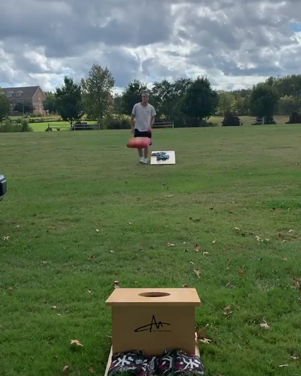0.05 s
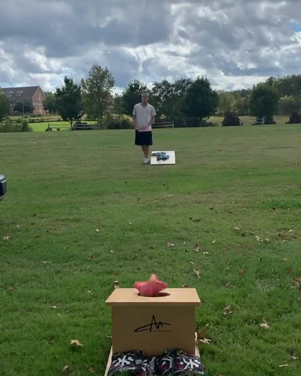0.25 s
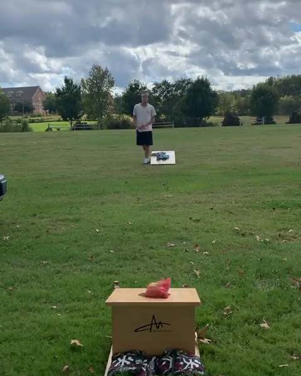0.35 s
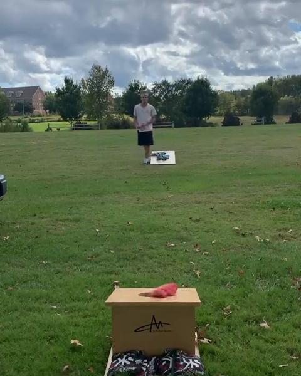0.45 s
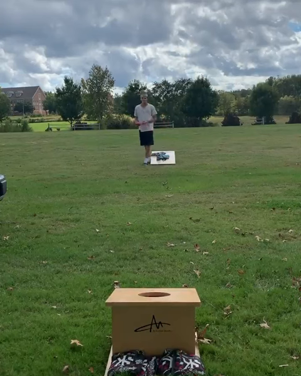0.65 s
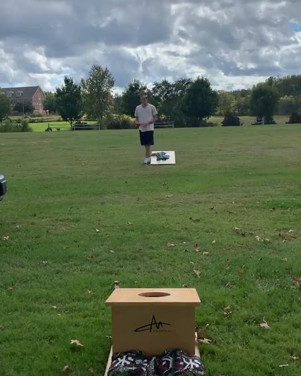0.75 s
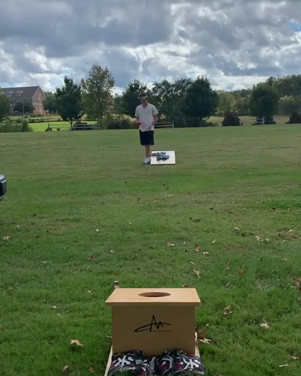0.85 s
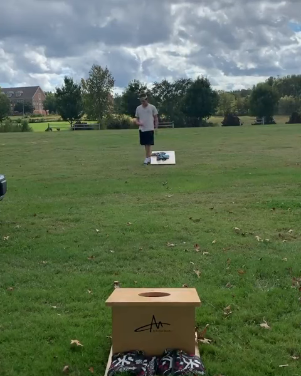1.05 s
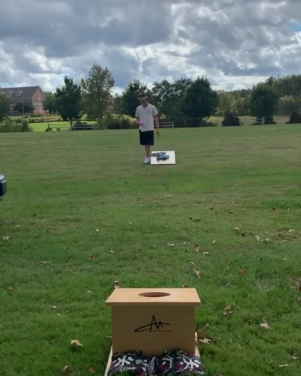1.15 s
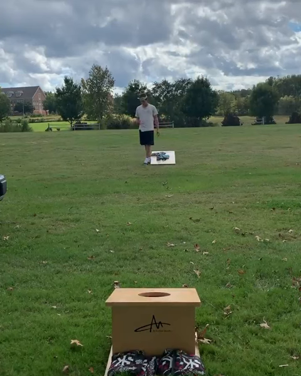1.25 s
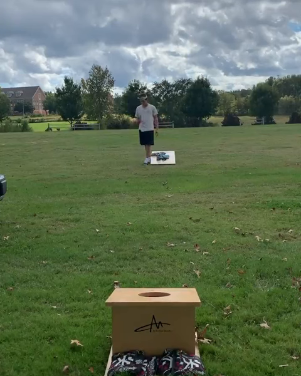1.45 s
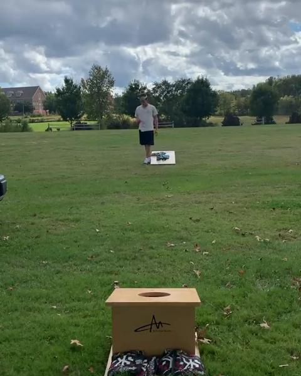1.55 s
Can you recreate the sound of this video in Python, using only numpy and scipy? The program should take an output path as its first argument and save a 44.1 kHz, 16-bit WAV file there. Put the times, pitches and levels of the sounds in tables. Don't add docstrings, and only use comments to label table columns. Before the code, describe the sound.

One sharp, dry wooden thud close to a phone microphone, followed by a quick granular settling and faint cloth rustle, then only steady distant engine hum and wind in trees across an open grassy field.

```python
import sys
import numpy as np
from scipy import signal
from scipy.fft import rfft, irfft
from scipy.io import wavfile
from scipy.ndimage import uniform_filter1d

SR = 44100
rng = np.random.default_rng(int(sys.argv[2]) if len(sys.argv) > 2 else 0)


def magnitude_from_level(level_db):
    exponent = np.asarray(level_db, float) / 20
    return 10 ** exponent


def transcribe(signal):
    frames = np.atleast_2d(signal).T
    limited = np.clip(frames, -1, 1)
    pcm = np.round(limited * 32767).astype(np.int16)
    wavfile.write(sys.argv[1], SR, pcm)


N = 70560

# [f/Hz, level/dB per Hz]
FIELD_SPECTRUM = [(25, -39), (60, -5.5), (130, -11.5), (400, -21.5), (850, -19), (1900, -28), (2450, -40.5),
                  (4000, -39.5), (16000, -67.5)]
# [f/Hz, width/Hz, level/dB]
ENGINE_HUM = [(52, 7.5, -49.5), (72.9, 1.9, -46), (89.2, 15, -51), (102.2, 4, -43.5), (123.4, 10, -49),
              (189.8, 17, -64), (305.5, 9.1, -52)]
# [f/Hz, width/Hz, level/dB]
TREBLE_GAPS = [(4684, 208, -25), (9110, 120, -31), (10200, 350, -8.5), (12500, 270, -12), (13100, 300, -24),
               (14800, 1400, -3)]
# [t/s, half length/s, level/dB]
CLOTH_SLIDES = [
    (.28, .04, -64),
    (.375, .05, -69),
    (.62, .04, -83),
    (.71, .03, -80),
    (1.6, .012, -62),
]
# [f/Hz, level/dB per Hz]
CLOTH_SPECTRUM = [(2000, -29), (6000, -6), (10000, -3), (16000, -15)]
# [f/Hz, level/dB per Hz]
SLAP_SPECTRUM = [(300, 12), (900, 6.5), (2000, 0.5), (3700, 0), (6000, -8), (8000, -20.5), (11500, -12),
                 (16000, -21)]
# [f/Hz, level/dB per Hz]
SETTLE_SPECTRUM = [(300, -5), (1000, 1), (2000, 2.5), (4000, 0.5), (6000, -7), (9000, -13.5),
                   (16000, -19.5)]
# [t/s, level/dB]
CLUMP_KNOCKS = [
    (0.2417, -24.5),
    (0.2424, -23),
    (0.2455, -16.5),
    (.2481, -25),
    (0.2511, -36),
    (0.2543, -35),
    (0.257, -24),
]
# [f/Hz, level/dB, t60/s]
BRIGHT_LID_MODES = [(5920, -1.5, .007), (8050, -8, 0.0079), (11060, -9.5, 0.0089), (3250, -4, 0.01)]
# [t/s, level/dB, contact time/ms]
BAG_PUSHES = [
    (.24109, -1, .4),
    (.24242, 3.5, 1.27),
    (.24649, 2.4, 1.5),
]
# [f/Hz, level/dB, t60/s, sign of the mode shape under the bag]
BOX_MODES = [(150.5, -17.6, .175, 1), (722, -32, .16, 1), (301, -24, .14, 1), (365, -18.5, .13, 1),
             (530, -14, .024, 1), (638, -9, .016, 1), (735, -9.3, .02, 1), (827, -9.6, .032, -1),
             (1006, -23.4, .052, -1), (1207, -16, .045, 1), (1420, -27, .06, -1), (1640, -18.5, .072, -1),
             (1800, -13.5, .035, 1), (2175, -27, .07, 1)]
# [f/Hz, side minus mid level/dB]
PORT_DIFFERENCE = [(60, -48), (130, -58), (350, -10.5), (800, -28), (1300, -26), (2400, -7), (4400, -13.5),
                   (15000, -1.5)]
# [f/Hz, width/Hz, level/dB]
CASE_RESONANCES = [(4694, 750, -7), (6430, 2580, 5.5)]


def curve(points):
    p = np.array(points, float)
    return np.interp(np.log(np.fft.rfftfreq(2 * N, 1 / SR) + 1), np.log(p[:, 0]), p[:, 1])


def bumps(table):
    f = np.fft.rfftfreq(2 * N, 1 / SR)
    return sum(db * np.exp(-((f - hz) / width) ** 2) for hz, width, db in table)


def colour(x, db):
    cepstrum = irfft(db * np.log(10) / 20)
    cepstrum[1:N] *= 2
    cepstrum[N + 1:] = 0
    response = np.exp(rfft(cepstrum))
    return irfft(rfft(x, 2 * N) * response)[..., :N]


def unit(x):
    return x / np.sqrt(np.mean(x ** 2))


def ring(x, hz, t60):
    pole = np.exp(2j * np.pi * hz / SR - np.log(1000) / (t60 * SR))
    return signal.lfilter([1], [1, -pole], x).imag


def walk(rate):
    k = int(SR / rate)
    held = np.repeat(rng.standard_normal(N // k + 1), k)
    smooth = uniform_filter1d(uniform_filter1d(held, k), k)
    return unit(smooth[:N])


def field(t):
    floor_db, gust_db, flicker_db = -40, 0.4, 0.7
    hum_steady, hum_loose = 0.81, 0.5
    octaves = np.log2(np.fft.rfftfreq(N, 1 / SR) + 1)
    gust = gust_db * walk(0.55)
    tone_db = curve(FIELD_SPECTRUM) + bumps(TREBLE_GAPS)
    noise = rfft(unit(colour(rng.standard_normal((2, N)), tone_db)))
    out = 0
    for octave in range(4, 15):
        window = np.cos(np.pi / 2 * np.clip(octaves - octave, -1, 1)) ** 2
        band = irfft(noise * window, N)
        out = out + band * magnitude_from_level(floor_db + gust + flicker_db * walk(9.13))
    for hz, width, db in ENGINE_HUM:
        cycles = hz * t + rng.random() + 0.029 * walk(3)
        steady = np.sin(2 * np.pi * cycles)
        loose = unit(ring(rng.standard_normal(2 * N), hz, 1.57 / width)[N:])
        hum = magnitude_from_level(db) * (hum_steady * steady + hum_loose * loose)
        out = out + hum * np.array([[1], [0]])
    return out


def cloth(t):
    env = sum(magnitude_from_level(db) * np.exp(-((t - s) / half) ** 2) for s, half, db in CLOTH_SLIDES)
    tone_db = curve(CLOTH_SPECTRUM) + bumps(TREBLE_GAPS) / 2
    rustle = unit(colour(rng.standard_normal((2, N)), tone_db))
    return rustle * env * magnitude_from_level(2 * walk(59))


def grains():
    per_s, spread_db = 9000, 3
    size_chance, sign_chance, hit_chance = rng.random((3, N))
    size = magnitude_from_level(-spread_db * np.log(1 - size_chance)) * np.sign(sign_chance - 0.5)
    return unit(size * (hit_chance < per_s / SR))


def filling_layer(since_hit, db, t60, spectrum):
    clicks = np.array([grains(), grains()])
    return unit(colour(clicks, curve(spectrum))) * magnitude_from_level(db - 60 * since_hit / t60)


def rattle(t):
    start_s, attack_s = 0.2408, 0.00085
    side_db, side_rise_s = 12.5, 0.059
    since_hit = np.maximum(t - start_s, 0)
    slap = filling_layer(since_hit, -15.5, 0.08, SLAP_SPECTRUM)
    settle = filling_layer(since_hit, -26, 0.17, SETTLE_SPECTRUM)
    mid, side = (1 - np.exp(-since_hit / attack_s)) * (slap + settle)
    side_growth = 1 - np.exp(-since_hit / side_rise_s)
    return np.array([mid, side * magnitude_from_level(side_db) * side_growth])


def clacks():
    ticks = np.zeros(N)
    for s, db in CLUMP_KNOCKS:
        ticks[int(s * SR)] = magnitude_from_level(db)
    knocks = sum(magnitude_from_level(db) * ring(ticks, hz, t60) for hz, db, t60 in BRIGHT_LID_MODES)
    return knocks * np.array([[1], [0]])


def box(t):
    lag_cycles = 0.625
    side_db, side_lag_s = -3.5, 0.012
    out = 0
    for hz, db, t60, sign in BOX_MODES:
        force = 0
        for s, push_db, ms in BAG_PUSHES:
            phase = np.clip((t - s - lag_cycles / hz) / (ms / 1000), 0, 1)
            force = force + magnitude_from_level(push_db) * np.sin(np.pi * phase) ** 2 / (ms / 2000)
        mode = ring(np.diff(force, prepend=0), hz, t60) / (2 * np.pi * hz)
        out = out + sign * magnitude_from_level(db) * mode
    low_cut = signal.butter(2, 85, "high", fs=SR, output="sos")
    out = signal.sosfilt(low_cut, out)
    side = magnitude_from_level(side_db) * np.interp(t - side_lag_s, t, out)
    return np.array([out, side])


def scene():
    t = np.arange(N) / SR
    mid, side = rattle(t) + cloth(t) + field(t) + box(t) + clacks()
    side = colour(side, curve(PORT_DIFFERENCE))
    return np.array([mid + side, mid - side])


def band_limit(x):
    return signal.sosfilt(signal.butter(12, 16420, fs=SR, output="sos"), x)


def record(dry):
    top_hz, slope_hz = 15750, 200
    f = np.fft.rfftfreq(2 * N, 1 / SR)
    top_db = -60 * np.clip((f - top_hz) / slope_hz, 0, 1)
    mix = colour(dry, bumps(CASE_RESONANCES) + top_db)
    return band_limit(mix)


dry = scene()
out = record(dry)
transcribe(out)
```